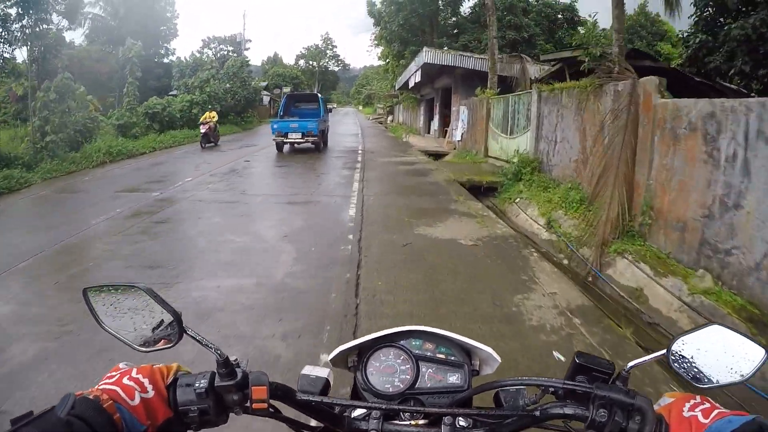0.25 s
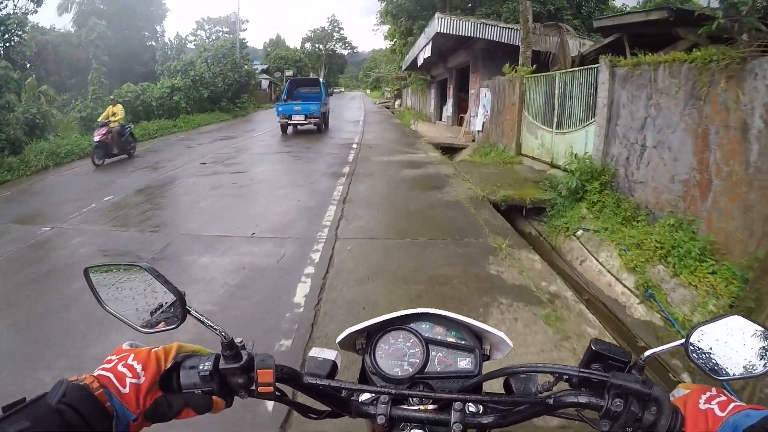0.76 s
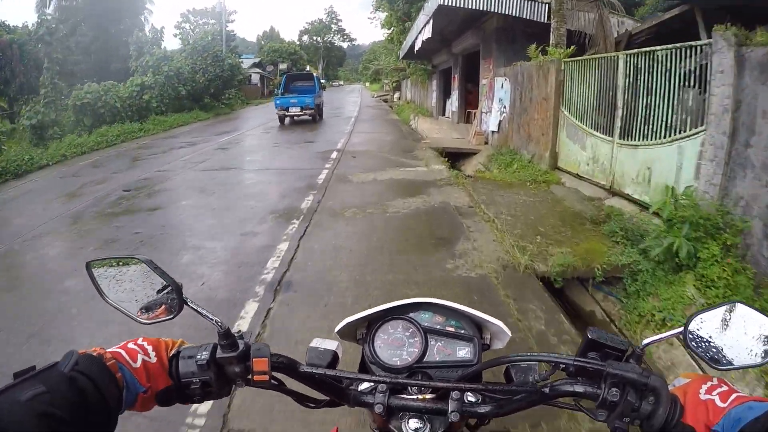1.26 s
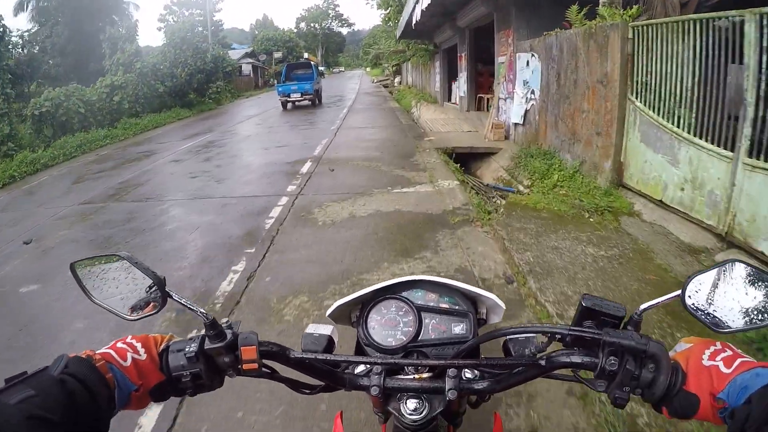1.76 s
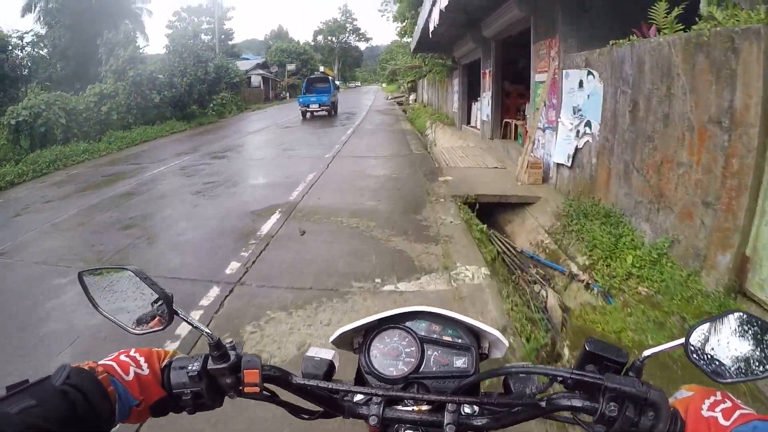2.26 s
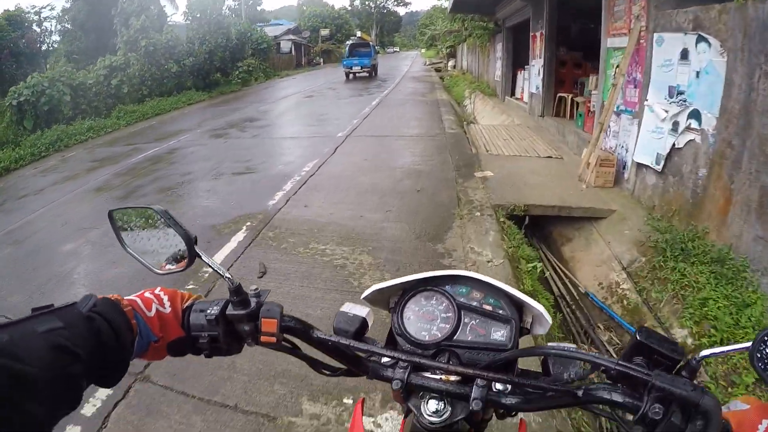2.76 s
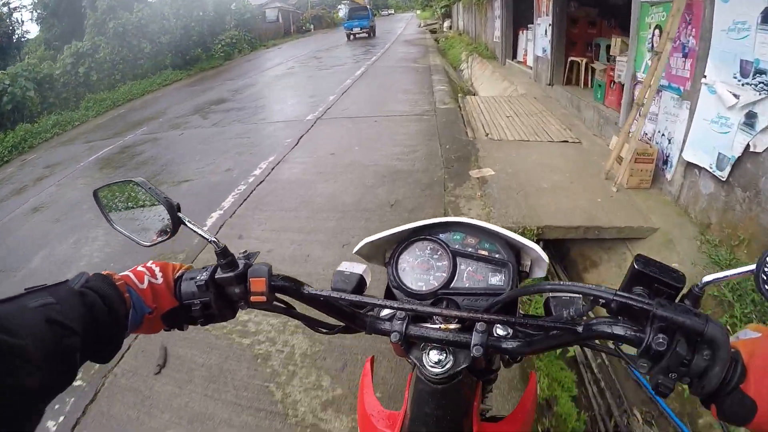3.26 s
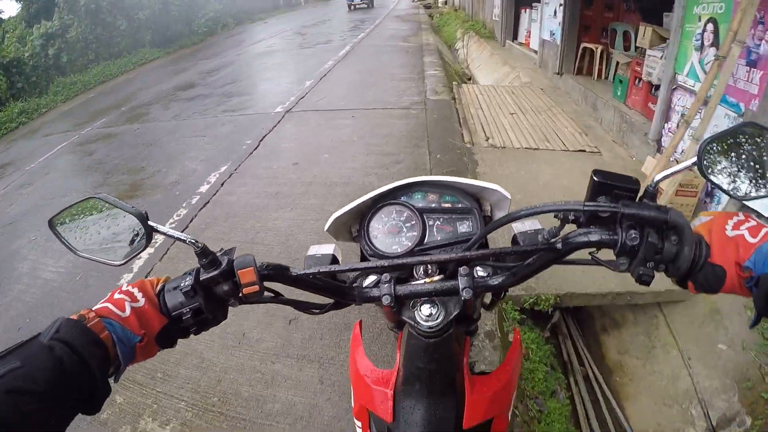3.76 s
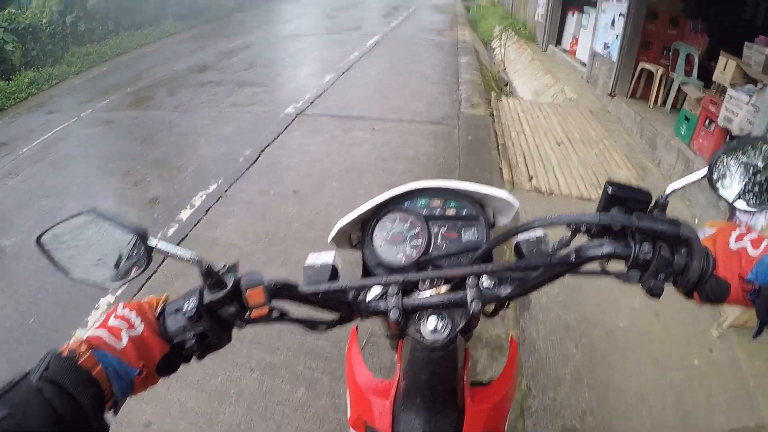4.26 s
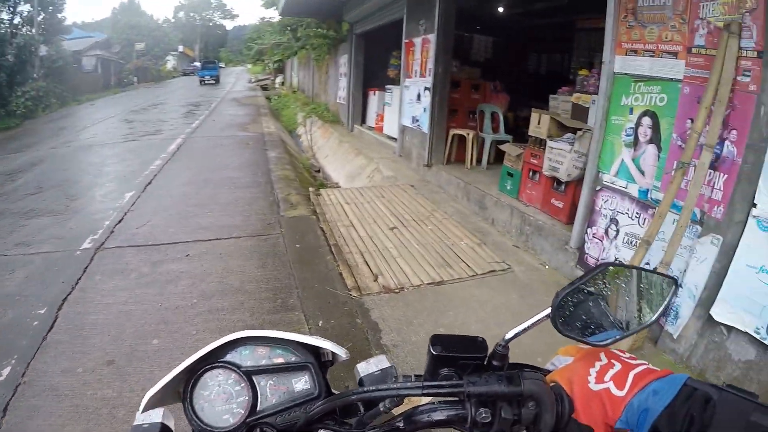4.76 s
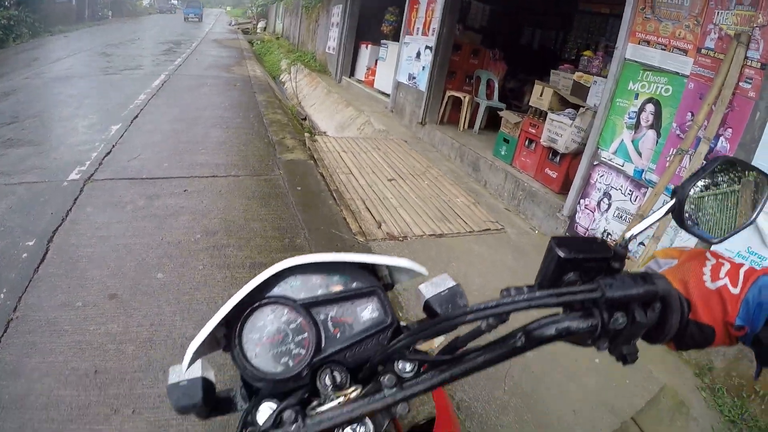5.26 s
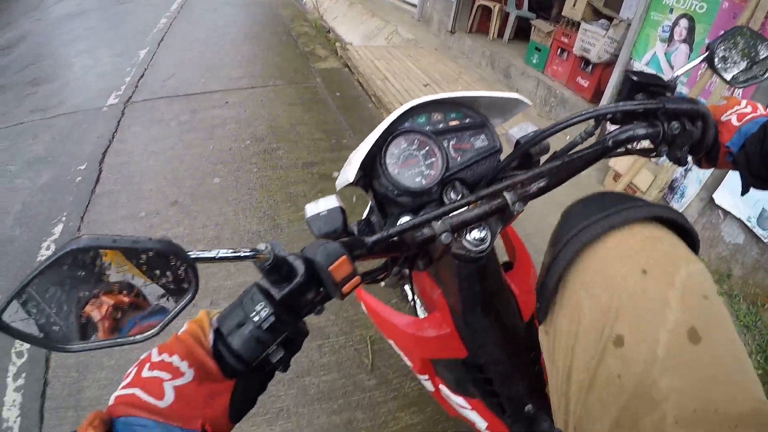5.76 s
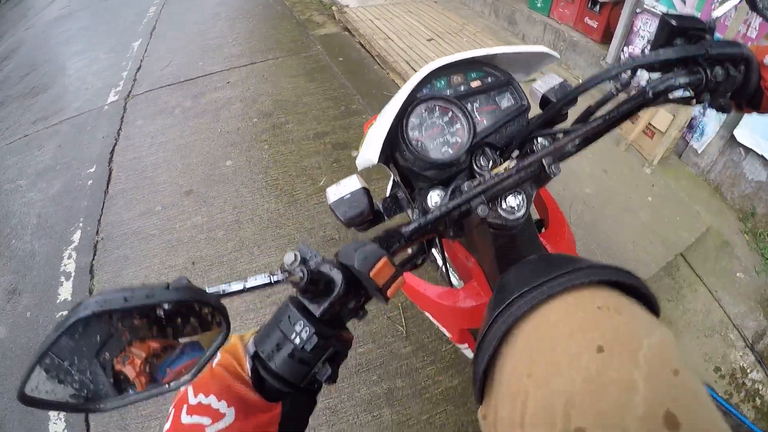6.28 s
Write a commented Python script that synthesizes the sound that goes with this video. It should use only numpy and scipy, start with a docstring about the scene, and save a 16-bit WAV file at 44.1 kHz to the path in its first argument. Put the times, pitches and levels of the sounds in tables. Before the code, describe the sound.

A mono, muffled sound from a camera in a closed case on a motorcycle rider, outdoors on a wet road. From 0 s, very low wobbling throbs and lumpy wind buffets dominate, strongest in the first half second, over thin, flickering tyre and spray hiss. Two faint engine tones, one rising slightly in pitch, hum underneath. Light plastic ticks fall at 0.0, 0.1, 0.3 and 0.6 s; a tiny wet chirp near 1.15 s. At 2.36 s a sharp, hollow clack is the loudest hit. Spray crackles briefly around 2.7 s and surges at 3.2 s. The hums vanish by about 4.2 s and the hiss slowly sinks and darkens. A soft low rub passes at 4.3 s. From 5.2 s to the end at 6.5 s, clothing scuffs the case in short bursts, with dull thuds, clicks and heavy air shoves, densest around 5.6 to 6.1 s, again near 6.3 s.

```python
"""On a wet road, a motorcycle rolls slowly to a stop, heard by a camera in a closed case on the rider.
Wind is slow sway and coloured noise, tyre and spray hiss is noise coloured by air cavities, and chirps are
short fuzzy tones. Two faint engine tones hum, and the mount wobbles and swings as very low sines.
Drops and straps tap the case and ring its modes; near the end clothing rubs it with many tiny slips,
while sudden shoves push on the microphone port."""
import sys
import numpy as np
from scipy import signal
from scipy.fft import rfft, irfft
from scipy.io import wavfile
from scipy.ndimage import uniform_filter1d

SR = 44100
rng = np.random.default_rng(int(sys.argv[2]) if len(sys.argv) > 2 else 0)


def inscribe(sig):
    """Save sig as 16-bit PCM at rate SR to the path in sys.argv[1].

    A 1-D sig is mono; a 2-D sig holds one channel per row.
    Samples are clipped to [-1, 1] before scaling.
    """
    pcm = np.round(np.clip(np.atleast_2d(sig).T, -1, 1) * 32767)
    wavfile.write(sys.argv[1], SR, pcm.astype(np.int16))


N = 287523  # samples

# The ride as the bike slows. Each row: time in seconds, slow sway level in dB, idle wobble level in dB,
# wind rumble level in dB, tyre hiss level in dB, spray brightness in dB per octave.
RIDE = [(0.0, -30, -39, -35, -48, 0), (0.5, -30, -34, -38, -47, 0.5), (0.9, -41, -30, -42, -48, -0.5),
        (1.2, -36, -38, -42, -47.5, -0.5), (1.55, -35, -31, -41, -47.5, -0.5),
        (1.9, -33, -38, -43.5, -46.5, -0.5), (2.2, -50, -32.5, -43, -48, 0),
        (2.6, -34, -33.5, -46, -51, -0.5), (3.2, -35.5, -35, -46.5, -51, -1.5),
        (3.7, -43, -36.5, -44.5, -53, -1), (4.4, -46, -35, -47, -52.5, -1.5),
        (5.0, -54, -38.5, -44.5, -54.5, -2), (5.3, -34, -35, -39.5, -53.5, -3.5),
        (5.65, -52, -44, -36.5, -51.5, -4), (6.1, -41, -31.5, -46.5, -54.5, -3.5),
        (6.4, -37, -46, -42, -55, -6), (6.52, -38, -33, -42.5, -57, -0.5)]
# Ringing modes of the camera case. Each row: pitch in Hz, strength when tapped in dB,
# strength when rubbed in dB, basic time to die by 60 dB in seconds.
CASE = [(78.2, -11, -1, 0.13), (126, -48, -5.5, 0.036), (167, -4, -10, 0.045), (188.6, -2.5, -4.5, 0.07),
        (229.5, -5.5, -1, 0.068), (270.4, 2, -1, 0.06), (478, -14.5, -11, 0.059), (567.6, -16.5, -10, 0.05),
        (744, -33, -18, 0.0092), (965, 4, -4.5, 0.016), (1144, 1, 1, 0.019), (1560, 2, -3.5, 0.018),
        (1900, -18, -8.5, 0.018), (2343, -13.5, -22, 0.033), (2585, -4, -30, 0.019),
        (3380, -7, -9.5, 0.0097), (4420, -13.5, -14, 0.0081), (6750, -22.5, -32, 0.004)]
# Strokes of cloth over the case. Each row: start in seconds, length in seconds, heavy drag on the low modes
# in dB, scrape on the middle modes in dB, grit on the high modes in dB, push of air on the port in dB,
# basic change of level over the stroke in dB.
RUBS = [(4.298, 0.16, -51.5, -77, -76, -44, 5.5), (5.185, 0.028, -42, -48, -54.5, -51, -13),
        (5.264, 0.064, -31.5, -53.5, -63, -32, -2), (5.313, 0.063, -35, -62, -66, -27.5, -1),
        (5.393, 0.07, -36.5, -55, -68, -30, -0.5), (5.465, 0.2, -47, -57, -79, -50, 0),
        (5.619, 0.047, -27, -38.5, -45.5, -31, 0), (5.661, 0.07, -26, -37.5, -51, -26.5, -3.5),
        (5.716, 0.082, -32, -47, -51.5, -30.5, -1), (5.803, 0.2, -37, -51.5, -59.5, -28.5, -4),
        (5.968, 0.082, -34, -44, -57, -33, -5), (6.026, 0.056, -32.5, -44.5, -51.5, -47, 1.5),
        (6.274, 0.032, -38.5, -44, -60, -52, -3.5), (6.367, 0.036, -36, -45.5, -56, -28, -2),
        (6.409, 0.044, -38, -55, -62, -38, -5)]


def gain_of(db):
    """Turn dB into a plain multiplier."""
    return 10 ** (np.asarray(db) / 20)


def evened(x):
    """Scale a sound to an rms level of 1."""
    return x / np.sqrt(np.mean(x ** 2) + 1e-20)


def read(points, hz):
    """Read a colour curve at hz, in straight lines over log frequency."""
    f, value = np.transpose(points)
    return np.interp(np.log(hz + 1), np.log(f + 1), value)


def follow(rows, t):
    """Read every column of a time table at the times t."""
    s, *columns = np.transpose(rows)
    return [np.interp(t, s, c) for c in columns]


def add(mix, s, sound):
    """Mix in a sound from s seconds on, cut off at the end."""
    part = mix[round(s * SR):][:len(sound)]
    part += sound[:len(part)]


def drift(hz):
    """Slow random motion of rms 1, with speeds that fade out above about hz."""
    spectrum = rfft(rng.standard_normal(N)) * np.exp(-(np.fft.rfftfreq(N, 1 / SR) / hz) ** 2)
    return evened(irfft(spectrum, N))


def bump(t, s, length):
    """A rounded hump of height 1 centred on s."""
    return np.cos(np.pi * np.clip((t - s) / length, -.5, .5)) ** 2


def swell(start, length, rise, fall):
    """Samples of one event, its gain that rises, holds and falls, and the share of it gone by."""
    span = slice(round(start * SR), min(N, round((start + length + fall) * SR)))
    t = np.arange(span.stop - span.start) / SR
    edges = np.clip(np.minimum(t / rise, (length - t) / fall + .5), 0, 1)
    return span, np.sin(np.pi / 2 * edges) ** 2, np.clip(t / length, 0, 1)


def wash(colour_db, patchy_db, size):
    """Noise from random short-time spectra, coloured by colour_db(hz, t) and by drifting patches."""
    hop = size // 4
    t, hz = np.arange(N // hop + 5) * hop / SR, np.fft.rfftfreq(size, 1 / SR)
    real, imaginary, patches = rng.standard_normal((len(t), len(hz), 3)).T
    patches = uniform_filter1d(patches, 10, 0)  # smooth over frequency
    patches = evened(uniform_filter1d(patches, 8, 1))  # smooth over time
    level_db = colour_db(hz[:, None], t) + patchy_db * patches
    spectra = (real + 1j * imaginary) * gain_of(level_db)
    return signal.istft(spectra, nperseg=size, noverlap=size - hop)[1][:N]


def ring(hz, db, t60, size=3000):
    """One dying mode that swings up within a fraction of its period."""
    t = np.arange(size) / SR
    rise = 1 - np.exp(-t * hz / 0.5)
    return gain_of(db - 60 * t / t60) * np.sin(2 * np.pi * hz * t) * rise


def distant_wash():
    """Steady noise stands for a distant wash and the noise of the microphone."""
    # Each row: frequency in Hz, relative strength in dB per Hz.
    colour = [(240, -25), (400, 5.5), (670, -6.5), (1700, -3.5), (3500, -12.5), (7000, -16), (12000, -22),
              (14500, -23), (15300, -29)]
    return gain_of(-61.5) * evened(wash(lambda hz, t: read(colour, hz), patchy_db=-1.5, size=512))


def air_sway():
    """Air pressure sways slowly, as a sine whose pitch and level wander."""
    sway_db = follow(RIDE, np.arange(N) / SR)[0]
    turns = np.cumsum(13 + 3.0 * drift(2.98)) / SR  # wanders around 13 Hz
    sway = np.sqrt(2) * np.sin(2 * np.pi * turns)
    return gain_of(sway_db + 4.3 * drift(2.6)) * sway


def wind_rumble():
    """Wind and road make a lumpy low noise, louder and darker when a buffet hits the microphone port."""
    # Each row: frequency in Hz, relative strength in dB per Hz.
    colour = [(30, -48), (40, -10.5), (59, -11.5), (91, -21.5), (150, -30.5), (200, -33.5), (260, -31.5),
              (310, -37), (345, -43.5), (392, -37), (450, -52), (900, -57), (1500, -100)]
    # Buffets on the port. Each row: time of the peak in seconds, length in seconds, rumble level in dB.
    buffets = [(0.013, 0.11, -29), (0.147, 0.063, -33.5), (0.256, 0.053, -33), (0.49, 0.094, -34),
               (0.573, 0.075, -40), (.78, .08, -53), (1.166, 0.064, -33.5), (1.238, 0.084, -35.5),
               (1.675, .08, -51), (2.81, 0.17, -37), (3.027, 0.058, -34.5), (3.492, 0.057, -37),
               (3.837, 0.069, -36.5), (4.11, 0.044, -41), (4.178, 0.095, -36), (4.332, 0.12, -43),
               (4.459, 0.081, -33)]
    calm_tilt_db, darkest_db = 1.5, -5.5  # dB per octave
    darker_db = -0.23  # dB per octave for each dB of buffet
    now = np.arange(N) / SR
    calm_db = follow(RIDE, now)[2]
    power = gain_of(calm_db) ** 2
    for s, length, db in buffets:
        power = power + gain_of(db) ** 2 * bump(now, s, length)
    rumble_db = 10 * np.log10(power)

    def colour_db(hz, t):
        buffet_db = np.interp(t, now, rumble_db - calm_db)
        tilt_db = np.maximum(calm_tilt_db + darker_db * buffet_db, darkest_db)
        return read(colour, hz) + tilt_db * np.log2((hz + 1) / 60)
    rumble = evened(wash(colour_db, patchy_db=1.0, size=2048))
    return gain_of(rumble_db + 2.14 * drift(26.0)) * rumble


def mount():
    """The mount idles at a low wobble; after each jolt a swing on its strap replaces the idle motion."""
    # Each row: start in seconds, length in seconds, rms level in dB, pitch in Hz before a small waver.
    swings = [(0.009, 0.2, -24, 29), (0.349, 0.048, -24.5, 20.56), (0.402, 0.18, -23.5, 25.87),
              (0.673, 0.34, -25.5, 24.85), (1.093, 0.085, -26, 27.2), (1.263, 0.1, -25.5, 24.5),
              (1.523, 0.2, -23.5, 25.55), (1.777, 0.15, -23.5, 29.5), (1.961, 0.048, -24.5, 27.8),
              (2.329, 0.03, -21, 28), (2.411, 0.16, -26.5, 30.6), (2.843, 0.17, -26.5, 28),
              (3.077, 0.032, -40, 24), (3.163, 0.062, -26, 25.4), (3.253, 0.11, -21, 25.2),
              (3.472, 0.075, -26, 28), (3.991, 0.068, -29, 30), (4.042, 0.11, -19, 30.6),
              (4.76, 0.085, -22, 27), (5.203, 0.062, -19, 23.9), (5.806, 0.074, -25.5, 25.8),
              (6.041, 0.094, -39, 23.6), (6.2, 0.081, -22, 21)]
    rise_s, fall_s, idle_hz = 0.043, 0.055, 26.74  # the idle pitch is a middle value
    waver = 1 + 0.037 * drift(6.3)
    idle_db = follow(RIDE, np.arange(N) / SR)[1] + 0.85 * drift(16.0)
    idle_turns = np.cumsum(idle_hz * (1 + 0.1223 * drift(4.95))) / SR
    out = gain_of(idle_db) * np.sin(2 * np.pi * idle_turns)
    for (start, length, db, hz), phase in zip(swings, rng.random((len(swings), 1))):
        span, edges, _ = swell(start, length, rise_s, fall_s)
        turns = np.cumsum(hz * waver[span]) / SR + phase
        swing = gain_of(db) * edges * np.sin(2 * np.pi * turns)
        out[span] = np.sqrt(1 - edges ** 2) * out[span] + swing
    return np.sqrt(2) * out  # a sine of rms 1 peaks at root 2


def hum(rows, waver, waver_hz):
    """A sine tone whose pitch wavers a little about its curve."""
    t = np.arange(N) / SR
    hz, level_db = follow(rows, t)
    start, end = rows[0][0], rows[-1][0]
    fade = np.clip(np.minimum(t - start + .05, end + .05 - t) / .05, 0, 1)
    turns = np.cumsum(hz * (1 + waver * drift(waver_hz))) / SR + rng.random()
    return np.sqrt(2) * gain_of(level_db) * fade * np.sin(2 * np.pi * turns)


def engine():
    """Two faint engine tones follow their pitch curves while their levels flutter."""
    # One table for each tone. Each row: time in seconds, middle pitch in Hz, middle rms level in dB.
    tones = [
        [(0, 268, -59), (.25, 271, -52.5), (.5, 274, -58), (1, 279.4, -55.5), (1.3, 283.1, -57.5),
         (1.6, 286, -59.5), (2.3, 290, -63), (3, 293.8, -60), (4.2, 299.6, -82)],
        [(1.45, 225, -70), (1.6, 228, -55.5), (2, 230.7, -58), (2.35, 233.5, -54.5), (2.6, 233, -55),
         (2.9, 235.3, -55.5), (3.3, 237.3, -57), (3.75, 236.5, -58.5), (4, 231, -75)],
    ]
    return sum(hum(rows, waver=0.002, waver_hz=3.7) * gain_of(1.1 * drift(16.0)) for rows in tones)


def chirps():
    """Short wet chirps in the spray: fuzzy tones that rise a little in pitch."""
    # Each row: time of the peak in seconds, peak level in dB, middle pitch in Hz, length in seconds.
    chirp_rows = [(1.155, -45, 4300, 0.027), (2.69, -49, 5040, 0.021), (2.935, -51, 4030, 0.022),
                  (4.563, -58.5, 5750, 0.16)]
    out = np.zeros(N)
    for s, db, hz, length in chirp_rows:
        size = round(length * SR)
        fuzz = evened(uniform_filter1d(rng.standard_normal(size), 60))
        climb = 0.0137 * np.linspace(-1, 1, size)
        turns = np.cumsum(hz * (1 + climb + 0.034 * fuzz)) / SR
        add(out, s - length / 2, gain_of(db) * np.hanning(size) * np.sin(2 * np.pi * turns))
    return out


def tyres():
    """Water hisses under the tyres, coloured by the air cavities; it flickers as spray flies."""
    # Each row: frequency in Hz, relative strength in dB per Hz before the brightness changes.
    colour = [(400, -28), (700, -16), (1590, -8), (2240, -6.5), (3300, -1.5), (3690, -4.5), (5840, -8.5),
              (9220, -25), (10800, -22), (12200, -27.5), (15200, -34)]
    # Air cavities that colour the hiss. Each row: frequency in Hz, width in Hz, basic lift in dB.
    cavities = [(1664, 95, 5.5), (2540, 113, 6), (3330, 170, 4.5), (4245, 540, 3.5), (5850, 170, 2.5),
                (6600, 210, 2), (7730, 230, 5.5), (8430, 210, 5.5), (10300, 330, 6)]
    # Surges and lulls of spray. Each row: time of the peak in seconds, length in seconds, hiss change in dB.
    splashes = [(0.305, 0.029, -1), (1.188, 0.15, 2), (1.606, 0.1, -3), (1.76, 0.15, 2), (2.596, 0.026, 0),
                (2.685, 0.04, 2.5), (2.719, 0.048, 4), (3.179, 0.084, 6)]

    def colour_db(hz, t):
        hiss_db, bright_db = follow(RIDE, t)[3:]
        lift_db = sum(db / (1 + (2 * (hz - f) / width) ** 2) for f, width, db in cavities)
        clear = np.clip(1 + 0.1 * (hiss_db + 53), 0, 2)  # louder hiss stands clearer in the cavities
        return read(colour, hz) + clear * lift_db + bright_db * np.log2((hz + 1) / 3500)
    hiss = evened(wash(colour_db, patchy_db=1.34, size=512))
    flicker_db = 0.68 * drift(9.3) + 0.66 * drift(36.0) + 1.43 * drift(210)
    now = np.arange(N) / SR
    splash_db = sum(db * bump(now, s, length) for s, length, db in splashes)
    return gain_of(follow(RIDE, now)[3] + flicker_db + splash_db) * hiss


def shoves():
    """A shove against the case makes pressure jump at the port, then swing back and die."""
    # Each row: start in seconds, level in dB before the rise and decay, swing pitch in Hz,
    # time to die by 60 dB in seconds, rise time in seconds.
    shove_rows = [(5.266, -10.5, 18.4, .3, 0.0093), (5.358, -17, 13.6, 0.095, 0.0037),
                  (5.84, -20, 38, .08, .006), (5.872, -16.5, 30, 0.11, .004), (6.281, -25, 9, 0.13, .002),
                  (6.369, -13, 22.7, 0.48, 0.0021)]
    out, t = np.zeros(N), np.arange(SR // 2) / SR
    for s, db, hz, t60, rise in shove_rows:
        jump = 1 - np.exp(-(t / rise) ** 2)
        add(out, s, gain_of(db - 60 * t / t60) * np.cos(2 * np.pi * hz * t) * jump)
    return out


def strokes():
    """Gains of drag, scrape, grit and push, whose powers add where strokes overlap."""
    # How far each follows the level change of a stroke: the shares for drag, scrape, grit and push.
    fade_share = [0.98, 2.5, 0.47, 0.31]
    power = np.full((4, N), 1e-12)
    for start, length, *level_db, fade_db in RUBS:
        span, edges, gone = swell(start, length, rise=0.006, fall=0.031)
        stroke_db = np.c_[level_db] + fade_db * np.c_[fade_share] * gone
        power[:, span] += (gain_of(stroke_db) * edges) ** 2
    return np.sqrt(power)


def rubbing():
    """Dense slips of cloth shake all modes of the flexing case, sparse scuffs strike those above 400 Hz
    together, and the cloth pushes air at the port."""
    # Air pushed by the cloth. Each row: frequency in Hz, relative strength in dB per Hz.
    push_colour = [(30, -8), (50, 4.5), (75, 2), (100, -3), (160, -9), (300, -23.5), (600, -73)]
    flex, flex_hz = 0.06, 18.0  # how far (rms share) and how fast the pressed case bends its modes off pitch
    group = np.searchsorted([400, 800], np.array(CASE)[:, 0])  # low, middle and high modes
    *gains, push = strokes()
    first = round(RUBS[0][0] * SR)
    size = N - first
    # on average 1200 slips and 90 scuffs a second, each of random strength
    slips = gain_of(2.17 * np.minimum(rng.exponential(1, size), 4)) * (rng.random(size) < 1200 / SR)
    scuffs = gain_of(8.5 + 3.3 * np.minimum(rng.exponential(1, size), 3)) * (rng.random(size) < 90 / SR)
    shaken = []
    for k, (hz, _, db, t60) in enumerate(CASE):
        signed_slips = slips * rng.choice([-1., 1.], size)
        hits = signed_slips + (-1) ** k * (hz > 400) * scuffs
        shaken.append(signal.oaconvolve(hits, ring(hz, db, 1.36 * t60))[:size])
    shaken = np.array(shaken)
    bent = np.cumsum(1 + flex * drift(flex_hz)[first:])  # uneven reading speed bends the pitch
    out, lumps = np.zeros(N), gain_of(1.33 * drift(34.0))  # the cloth grips unevenly
    for k, gain in enumerate(gains):
        rubbed = evened(np.interp(bent, np.arange(size), sum(shaken[group == k])))
        out[first:] += (lumps * gain)[first:] * rubbed
    pushed_air = evened(wash(lambda hz, t: read(push_colour, hz), patchy_db=3.0, size=2048))
    return out + push * lumps * pushed_air


def taps():
    """Each tap snaps at the port, rings the high modes at once and the low modes a moment later."""
    # Each row: start in seconds, peak of the high tick in dB, peak of the low thud in dB,
    # brightness in dB per octave, peak of the bare snap in dB, share of the basic ringing time.
    tap_rows = [(0.014, -28, -22, 3.5, -33, 0.78), (0.094, -32, -52, 1, -29, 0.76),
                (0.323, -37, -60, 15, -55, 0.43), (0.633, -28.5, -34, 8, -24, 0.81),
                (1.147, -53, -57, 8, -62, .7), (1.776, -53, -67, 12, -64, .7),
                (2.251, -63, -38, 4, -52, 0.48), (2.3583, -14.5, -15, -1, -38, 0.85),
                (2.371, -38, -40, -4, -62, .8), (2.384, -40, -50, 6, -62, .8),
                (2.707, -46, -60, -5, -62, .7), (2.714, -52, -33.5, 4, -62, 1.45),
                (2.724, -43, -60, -2, -62, .7), (2.799, -53, -43, -5, -58, .7),
                (3.039, -47, -50, 11, -64, .7), (3.469, -52, -35, -7.5, -59, 0.59),
                (3.668, -62, -38, -8, -57, 0.67), (3.888, -51, -43, 14, -54, 0.71),
                (4.189, -52, -33.5, -7.5, -61, 0.9), (4.421, -64, -32, -9.5, -57, 0.91),
                (5.185, -43, -29.5, -2, -54, 1.1), (5.266, -58, -28.5, -1, -58, 0.77),
                (5.281, -58, -34, 6, -58.5, .6), (5.327, -56, -25, 2, -60, 0.75),
                (5.336, -56, -23.5, -1, -60, 0.89), (5.358, -60, -30, -6, -58, 0.55),
                (5.404, -60, -33, -6, -58, 0.79), (5.443, -58, -36, -4, -58, 0.56),
                (5.604, -38, -28, 3, -40, 0.55), (5.621, -47, -35, 2, -48, 0.66),
                (5.679, -44, -22, 5, -49, 1.1), (5.711, -44, -29, 5, -48, .6),
                (5.742, -45, -28, 2, -46, 0.52), (5.757, -42, -28, 8, -40, 0.46),
                (5.816, -34, -43, -2, -44, 0.54), (5.916, -45, -50, 10, -49, .4),
                (5.9778, -32, -26.5, 10, -56, 0.8), (6.048, -47, -22.5, -2, -52, 0.64),
                (6.072, -50, -35, -1, -52, 0.9), (6.265, -44, -36.5, -8, -50, 0.6),
                (6.281, -36, -28, 6, -47, 0.41), (6.367, -34, -24.5, -3.5, -58, 0.85),
                (6.391, -35.5, -41, 0, -52, 0.91), (6.412, -64, -25.5, 0, -62, 0.95),
                (6.43, -62, -32, -5, -62, 0.63)]
    out, chance = np.zeros(N), rng.standard_normal((len(tap_rows), len(CASE)))
    case_hz = np.array(CASE)[:, 0]
    low = case_hz < 650
    signs = -np.where(low, 1, (-1.) ** np.arange(len(CASE)))  # low modes dent together, high ones alternate
    signs = signs * np.where(case_hz > 1700, -1, 1)  # the highest ring reversed from the far wall
    u = np.arange(60) / SR / 0.00014 - 2.5
    snap = -u * np.exp(-u ** 2)  # a push and its rebound
    soft = 1 - np.exp(-(np.arange(3000) / SR / 0.00094) ** 2)  # the shell takes a moment to give
    spread = 0.012  # each mode lands a little off pitch, as an rms share
    for (s, tick_db, thud_db, bright_db, snap_db, share), detune in zip(tap_rows, chance):
        modes = []
        for (hz, db, _, t60), d in zip(CASE, detune):
            tilt_db = bright_db * np.log2(hz / (200 if hz < 650 else 1500))
            modes.append(ring(hz * (1 + spread * d), db + tilt_db, share * t60))
        modes = signs[:, None] * np.array(modes)
        tick, thud = sum(modes[~low]), sum(modes[low]) * soft
        add(out, s, gain_of(tick_db) * tick / abs(tick).max())
        add(out, s, gain_of(snap_db) * snap / abs(snap).max())
        add(out, s + 0.0023, gain_of(thud_db) * thud / abs(thud).max())
    return out


def scene():
    """All the layers added together, as one channel."""
    wind = distant_wash() + air_sway() + wind_rumble()
    bike = mount() + engine() + chirps() + tyres()
    handling = shoves() + rubbing() + taps()
    return (wind + bike + handling)[None]


def record(dry):
    """The first and last 300 samples fade; then a filter sets the upper limit of the recorder."""
    edge_hz = 15250
    from_start = np.arange(N)
    faded = dry * np.minimum(np.minimum(from_start, from_start[::-1]) / 300, 1)
    padded = np.pad(faded, ((0, 0), (511, 511)), "reflect", reflect_type="odd")
    low_pass = signal.firwin(1023, edge_hz, window=("kaiser", 9), fs=SR)
    return signal.oaconvolve(padded, low_pass[None], "valid")


dry = scene()
out = record(dry)
inscribe(out)
```